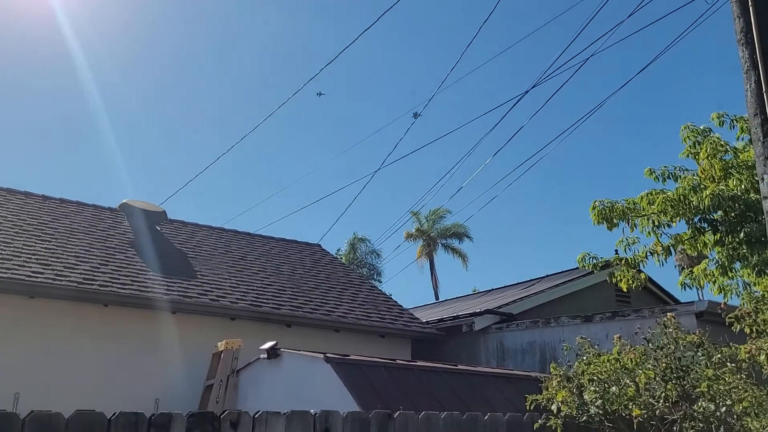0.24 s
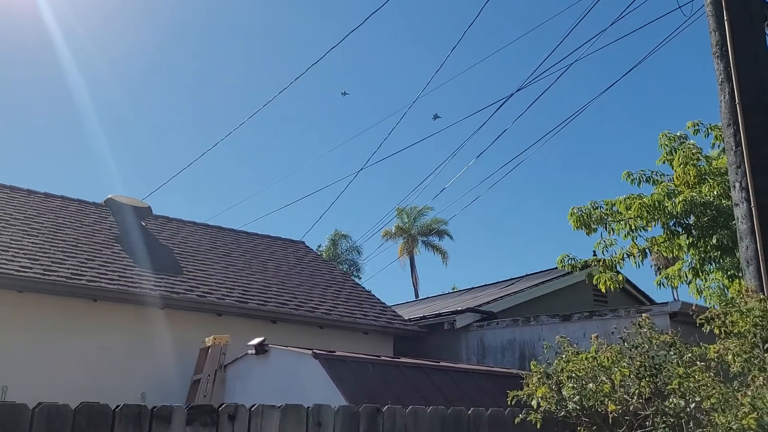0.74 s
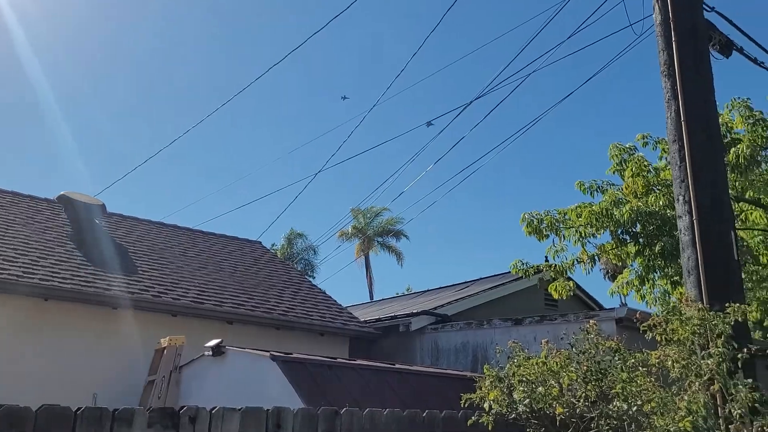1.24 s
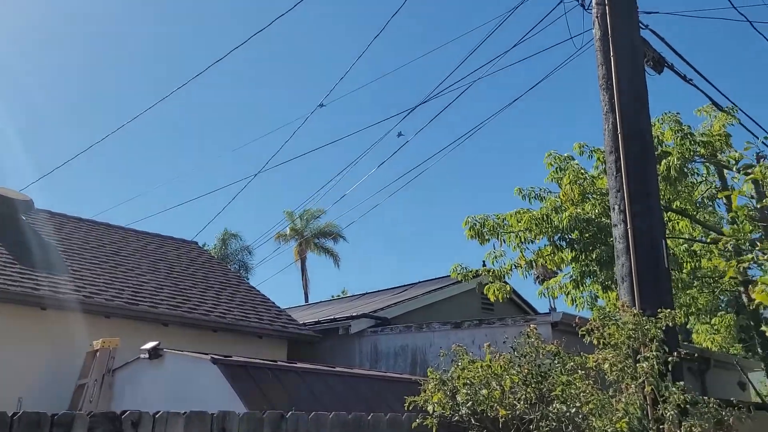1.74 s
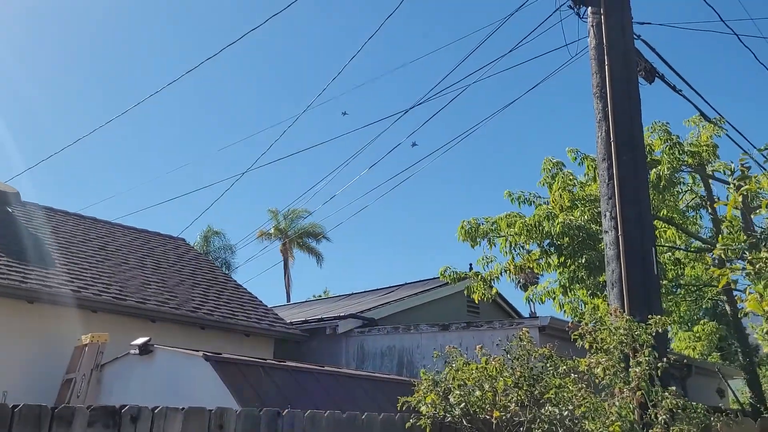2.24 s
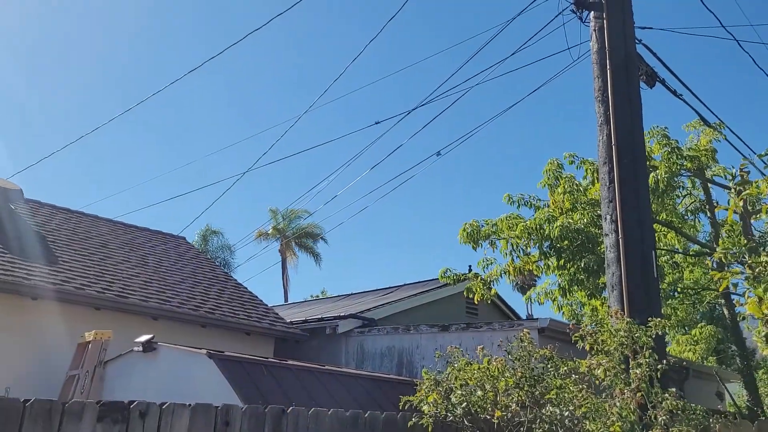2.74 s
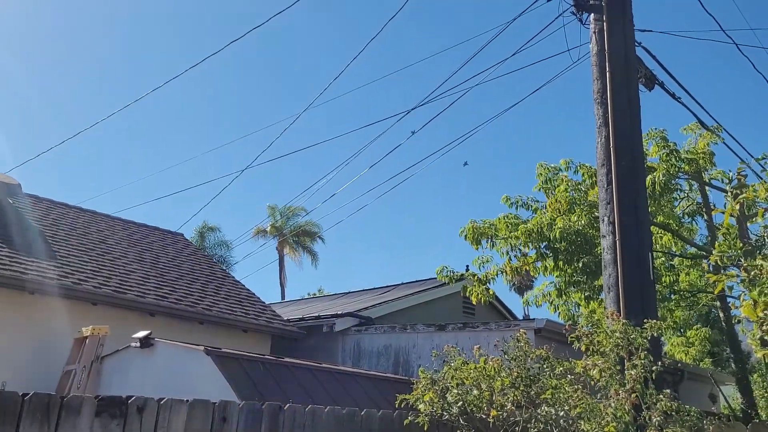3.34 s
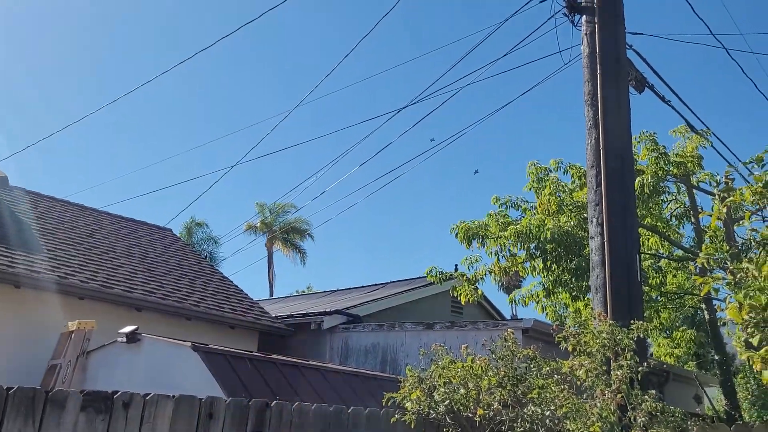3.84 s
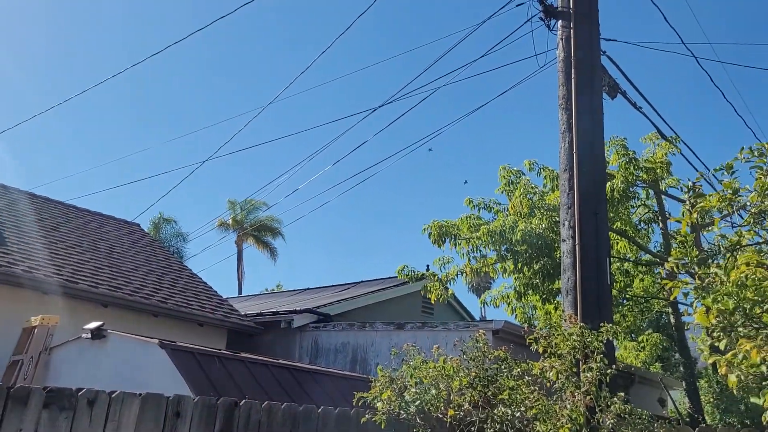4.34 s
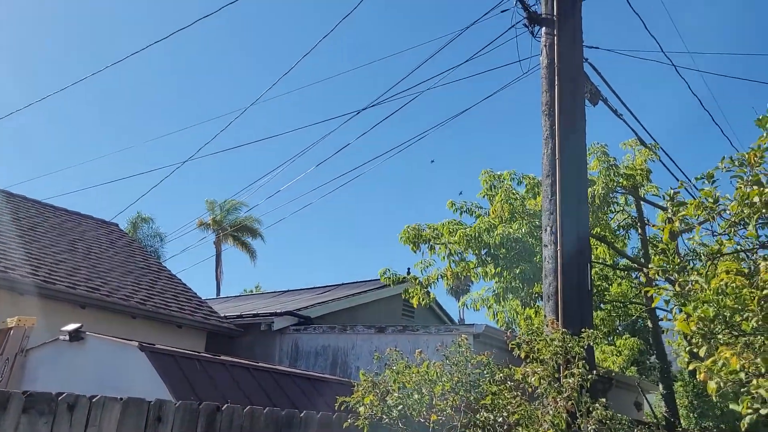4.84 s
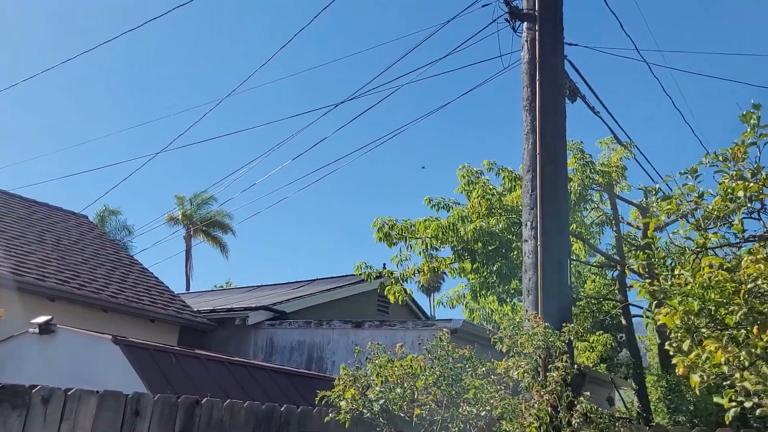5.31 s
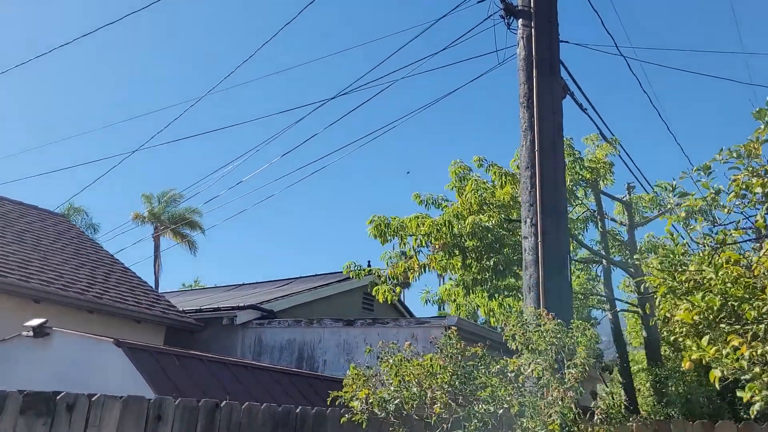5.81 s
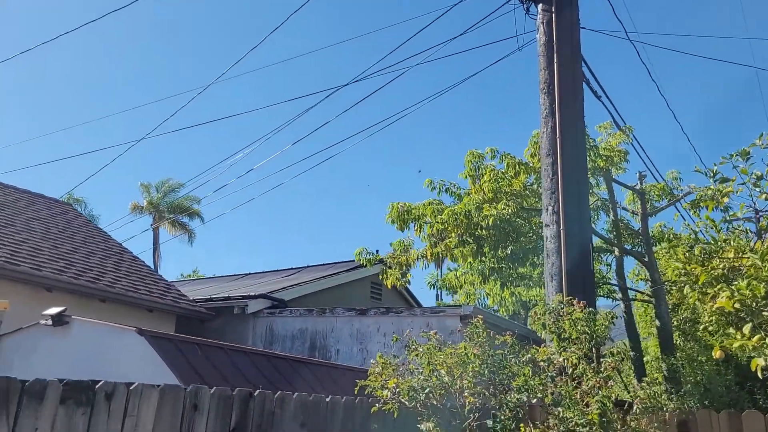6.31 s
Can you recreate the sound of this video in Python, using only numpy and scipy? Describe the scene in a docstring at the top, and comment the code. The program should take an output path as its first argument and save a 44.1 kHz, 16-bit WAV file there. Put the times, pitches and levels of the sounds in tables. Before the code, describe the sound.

A continuous far-off jet roar swells unevenly over a back yard, then turns lower, with fabric rubs and small finger clicks up close.

```python
"""A back yard between houses, with fighter jets crossing the sky far off.
Their roar is random noise with crackling shocks; it swells and fades in turbulent air, then deepens.
A nearby surface echoes it, brief howls and hollows cross it, and a thin hiss marks the nearest point.
Sleeves rustle (grainy noise), and skin scuffs and finger ticks sound on the microphone case.
Outdoor hiss and two faint falling whistles, perhaps a bird, lie behind."""
import sys
import numpy as np
from scipy.fft import rfft, irfft, next_fast_len
from scipy.io import wavfile
from scipy.ndimage import uniform_filter1d, minimum_filter1d

SR = 44100
rng = np.random.default_rng(int(sys.argv[2]) if len(sys.argv) > 2 else 0)


def file_out(sig):
    """Save sig as 16-bit WAV at sys.argv[1]."""
    # one column per channel
    cols = np.atleast_2d(sig).T
    # limit, then scale
    lim = np.clip(cols, -1, 1)
    pcm = np.round(lim * 32767).astype(np.int16)
    wavfile.write(sys.argv[1], SR, pcm)


N = 289737

# Colour of the outdoor hiss: [frequency_hz, level_db per Hz]
AIR_COLOUR = [(2000, 0), (3900, 0), (5200, -1), (6800, -4), (8500, -17), (11000, -17), (15500, -17)]
# Faint falling whistles, perhaps a bird: [start_s, length_s, start_pitch_hz, end_pitch_hz, level_db]
WHISTLE_NOTES = [(2.02, .2, 3720, 3630, -74), (2.2, .28, 4620, 4270, -78)]
# Bright colour of rubbing beside the ports: [frequency_hz, level_db per Hz]
CLOTH_COLOUR = [(1200, -2.5), (2500, 7), (3700, 0), (4300, -1), (6200, -3), (8700, -7), (11500, 1),
                (12500, 2), (13800, 0.5), (15500, -4)]
# Rubbing by sleeves and fingers, before one shared lift:
# [peak_s, rise_s, fall_s, level_db, left_minus_right_db]
RUB_STROKES = [(.09, 0.22, 0.21, -58.5, -0.5), (.57, 0.05, 0.086, -54.5, 0), (.82, 0.12, 0.097, -59, -1),
               (1.003, 0.073, 0.14, -54, -2), (1.17, 0.062, .04, -68.5, -3),
               (1.469, 0.058, 0.13, -53, -0.5), (1.7, 0.011, 0.081, -59, -0.5), (1.929, .06, .07, -68, -2),
               (2.12, .04, 0.054, -70.5, 4), (2.33, 0.098, 0.089, -69, 0), (2.568, 0.018, 0.013, -56, 7.5),
               (2.66, .1, .1, -71.5, 1), (2.728, 0.016, 0.01, -63, 9), (3.8, 0.017, 0.005, -59, 24.5),
               (3.43, 0.027, 0.04, -71, -2.5), (4.3, 0.027, 0.08, -74.5, -2), (4.804, 0.11, 0.13, -61.5, 0),
               (4.99, 0.044, 0.03, -52, 0.5), (5.14, 0.094, 0.13, -59, -0.5), (5.32, .07, 0.087, -62.5, 2),
               (5.535, 0.12, 0.12, -53, -0.5), (5.874, 0.022, 0.029, -51, 0), (6.2, 0.078, 0.11, -55, -0.5),
               (6.38, .03, 0.11, -62, -1)]
# Skin scuffs on the case, before one shared lift: [centre_s, half_width_s, level_db]
SKIN_SCUFFS = [(.572, 0.017, -52), (.8, 0.082, -61.5), (.955, 0.0076, -60), (1.475, 0.018, -57.5),
               (1.57, 0.034, -62), (4.995, 0.013, -56), (5.518, .012, -56), (5.566, .014, -57.5),
               (6.2, 0.026, -59)]
# Colour of a tick on the case, harder and lower than rubbing: [frequency_hz, level_db per Hz]
CASE_COLOUR = [(1200, -1), (2500, 10), (4000, 7), (6200, 3.5), (8700, -3.5), (12000, 1), (15500, -4.5)]
# Finger ticks; a slipping finger makes a quick run: [start_s, starting_level_db, left_minus_right_db]
FINGER_TICKS = [(0.0538, -38, 9), (.127, -48, 3), (.141, -50, 4), (0.278, -41, 4), (0.282, -39, -2),
                (0.8026, -45, -1), (.841, -43, 0), (.9445, -50, -1), (1.0125, -44, 3), (1.3777, -42, -2),
                (1.473, -50, 1), (1.49, -50, -3), (1.7, -52, -5.5), (2.6475, -47, 18), (2.73, -44, 17),
                (2.742, -53, 12.5), (3.762, -48, 9), (3.7803, -47, 15.5), (3.784, -47, 20),
                (3.7895, -46, 20), (3.795, -47, 20), (3.799, -39, 19.5), (3.802, -47, 20),
                (3.8047, -41, 25), (3.829, -49, 12), (4.9855, -39, 1), (5.512, -42, 0), (5.576, -40, 2),
                (5.637, -44, -1), (5.858, -41, -1), (6.066, -54, -1.5), (6.381, -43.5, 2.5)]
# Thin engine hiss that carries only at the nearest point: [frequency_hz, level_db per Hz]
ENGINE_HISS_COLOUR = [(1900, -8.5), (2600, 7.5), (3200, 7.5), (4100, -8), (5000, -3), (5500, 0),
                      (6000, -7.5), (7000, -20.5)]
# Surges and lulls as turbulent air focuses the roar:
# [centre_s, half_width_s, rumble_db, swell_db, rasp_db]
ROAR_SURGES = [(.105, .065, -2.5, -0.5, 6.5), (0.334, 0.051, 1.5, 0, -7.5), (.445, .035, 1.5, 2, 2),
               (.665, 0.053, 2.5, -2.5, -0.5), (0.964, 0.057, 5, -1.5, 5), (1.105, 0.066, 0, 3.5, 0.5),
               (1.209, 0.019, -1, -1.5, 2), (1.326, 0.088, 3, -5.5, -6), (1.453, .072, 0, 3, -5.5),
               (1.628, 0.037, 5, 3.5, -2), (1.74, 0.042, -0.5, 5, 2.5), (1.876, 0.081, -1, -0.5, -3.5),
               (2.039, .047, 3.5, -2.5, 1), (2.161, 0.1, -1.5, -3.5, -2.5), (2.366, .066, 1.5, -1.5, 1),
               (2.501, 0.032, 5.5, 1, 10.5), (2.619, .04, 5, 1, -2.5), (2.771, 0.052, -2, 1, 13),
               (3.154, 0.049, 3, 0.5, 2.5), (3.405, 0.052, 5.5, 2.5, 3), (3.6, 0.048, -2, -5, 3),
               (3.849, 0.059, -1.5, -4, 7), (4.074, .031, 2.5, 0, -5), (4.496, .062, -0.5, 3, -3.5),
               (4.739, 0.11, -1, 5, 0), (4.976, 0.041, 4, -2, 4), (5.098, 0.05, -0.5, -2, -2.5),
               (5.394, .046, -3, -2.5, -4), (5.619, 0.071, 2, 2.5, -4.5), (5.82, 0.08, 0, 5, 5.5),
               (6.037, 0.1, 1, 7, -2.5), (6.302, .067, 1, -1, -5.5), (6.498, .089, 3.5, -1, -9)]
# Exhaust colour after the long path through air: [frequency_hz, level_db per Hz]
EXHAUST_COLOUR = [(20, -45), (36, -26), (60, -13.5), (92, -10.5), (150, -0.5), (230, -1.5), (330, 2),
                  (410, -1), (510, 1), (640, -5), (790, -7.5), (1150, -14), (1380, -16), (1620, -18),
                  (2100, -35.5), (2700, -52)]
# Treble shaping by the air, applied on top of the exhaust colour: [frequency_hz, gain_db]
AIR_ABSORPTION = [(2700, 6), (3300, -6.5), (4100, -24), (5300, -18.5), (6500, -29), (8500, -42)]
# Resonances between the house walls: [frequency_hz, width_hz, lift_db]
YARD_RESONANCES = [(166.3, 27, -0.5), (329.5, 25, 1)]
# Sound scattered by walls and trees, against the direct sound: [frequency_hz, level_db]
SCATTERED_SOUND = [(30, -10.5), (60, -4), (110, -15.5), (180, -20), (270, -8), (380, -11), (600, -3.5),
                   (1100, -10.5), (1700, -6), (2200, 11.5), (3200, 6)]
# Balance between the ports: [frequency_hz, left_minus_right_db]
PORT_BALANCE = [(60, -1.5), (300, 0), (520, -2), (740, -0.5), (950, -3), (1650, -2.5), (2050, 0), (2500, 5),
                (3300, 1.5)]
# How far the left port leads the right: [frequency_hz, lead_radians]
LEFT_PORT_LEAD = [(0, 0), (550, 0.06), (850, 0.91), (1300, 1.54), (1550, 1.65), (1900, 2), (2200, 3.5),
                  (2700, 0.7)]
# Narrow howls, levels against the roar before its registers are levelled:
# [centre_s, half_width_s, pitch_hz, half_width_hz, level_db]
ROAR_HOWLS = [(.05, 0.1, 280.8, 62, -1), (0.119, 0.048, 1050, 150, -13.5), (0.45, 0.47, 481.8, 52, -6.5),
              (0.979, 0.14, 1076, 98, -16), (1.75, 0.16, 475.5, 34, 1.5), (1.741, 0.042, 760, 74, -7.5),
              (2.031, 0.028, 1653, 110, -29.5), (2.37, 0.054, 2410, 280, -42.5),
              (2.539, 0.038, 226.5, 33, -1), (2.771, 0.1, 537, 25, -5.5), (3.88, 0.19, 1212, 203, -15),
              (4.47, 0.11, 382, 17, -6.5), (4.72, 0.092, 327.6, 31, -10.5), (5.951, 0.054, 373, 79, -5),
              (6.08, 0.14, 722, 97, -9.5), (6.421, 0.22, 323, 32, -4.5), (6.487, 0.092, 163, 17, -10.5)]
# Borders between the pitch registers of the roar: [frequency_hz]
REGISTER_BORDERS = [110, 250, 600, 1250, 2100]
# How each register follows the pass, from deep thunder to the top of the rasp:
# [level_at_pass_db, before_db_per_s, after_db_per_s, rumble_share, swell_share, rasp_share]
REGISTER_PATHS = [(-41, -0.7, 3.5, -0.23, 0.0, 0.12), (-26.5, 1.5, 1.94, 1, 0.29, 0.032),
                  (-20, 1.04, -0.62, -0.25, 1.0, 0.067), (-26.5, 0.56, -0.45, -0.16, 0.37, 0.66),
                  (-41.5, 2, 0.13, 0.42, 0.0, 0.95), (-54, 0.5, -1.43, -0.36, 0.061, 0.64)]
# Strength of the quick random twinkle in each register: [strength_db]
REGISTER_TWINKLE = [0.43, 1.2, 1, 1.5, 2, 3.3]
# Hollow moments of the roar: [centre_s, half_width_s, frequency_hz, half_width_hz, gain_db]
ROAR_HOLLOWS = [(.74, 0.26, 637, 70, -4.5), (1.41, 0.064, 680, 130, -8.5), (4.621, 0.22, 887, 250, -1.5)]

PASS_S = 3.27   # the turning point, after which the roar deepens
ECHO_S, ECHO_SHARE = 0.002612, 0.2   # reflection from a nearby surface
CUTOFF_HZ = 15850


def from_db(db):
    """Turn decibels into gain."""
    return 10 ** (np.asarray(db) / 20)


def rms_one(x):
    """Scale to unit power."""
    return x / np.sqrt(np.mean(x ** 2) + 1e-20)


def seconds():
    """Give the time of every sample."""
    return np.arange(N) / SR


def bins():
    """List the frequencies on which filters are written."""
    return np.linspace(0, SR / 2, next_fast_len(N // 2 + 4096) + 1)


def filtered(x, response):
    """Pass x through a frequency response."""
    return irfft(rfft(x, 2 * len(response) - 2) * response)[..., :N]


def colour(points):
    """Join frequency and decibel points into a gain at every frequency."""
    hz, db = np.transpose(points)
    return from_db(np.interp(np.log(bins() + 1), np.log(hz), db))


def causal(gain):
    """Make the minimum-phase response with this gain: nothing sounds before its cause."""
    cepstrum = irfft(np.log(gain + 1e-9))
    cepstrum[1:len(gain) - 1] *= 2
    cepstrum[len(gain):] = 0
    return np.exp(rfft(cepstrum))


def panned(db):
    """Give left and right gains for a left-minus-right difference."""
    return from_db(np.array([[.5], [-.5]]) * db)


def stereo_noise():
    """Make separate random noise for each port."""
    return rng.standard_normal((2, N))


def wander(per_s):
    """Draw a new random value so many times a second and join them with straight lines."""
    return np.interp(seconds() * per_s, np.arange(400), rng.standard_normal(400))


def around(s, width_s):
    """Pick the samples within five half-widths of a moment."""
    first = max(int((s - 5 * width_s) * SR), 0)
    last = min(int((s + 5 * width_s) * SR), N)
    return np.arange(first, last)


def bell(s, width_s):
    """Rise and fall smoothly around one moment."""
    out, near = np.zeros(N), around(s, width_s)
    out[near] = np.exp(-.5 * ((near / SR - s) / width_s) ** 2)
    return out


def impulses(per_s, spread_db):
    """Scatter one-sided impulses in time, most small and a few large; unit power."""
    sizes = from_db(spread_db * np.minimum(rng.exponential(1, N), 4))
    train = sizes * (rng.random(N) < per_s / SR)
    return rms_one(train - train.mean())


def outdoor_air(level_db=-70, drift_db=5.5):
    """Coloured random noise gives a quiet outdoor hiss whose level drifts."""
    hiss = rms_one(filtered(stereo_noise(), colour(AIR_COLOUR)))
    return from_db(level_db + drift_db * wander(per_s=4.6)) * hiss * panned(0.94)


def whistles(blur_hz=40, blur_share=.5):
    """Soft notes slide down, slightly blurred by their way through the trees."""
    out = 0
    for s, length, start_hz, end_hz, level_db in WHISTLE_NOTES:
        along = np.clip((seconds() - s) / length, 0, 1)
        phase = 2 * np.pi * np.cumsum(start_hz + (end_hz - start_hz) * along) / SR
        blur = rms_one(filtered(stereo_noise(), 1 / (1 + (bins() / blur_hz) ** 2)))
        note = np.sin(phase) + blur_share * blur * np.cos(phase)
        out = out + from_db(level_db) * np.sin(np.pi * along) * note
    return out


def friction(grain_db=2.5):
    """Fibres catch and slip: dense fine grains in a hiss, different at each port."""
    grains = np.array([impulses(per_s=1800, spread_db=3.2) for port in range(2)])
    rough = stereo_noise() + from_db(grain_db) * grains
    return rms_one(filtered(rough, causal(colour(CLOTH_COLOUR))))


def handling(lift_db=3, catch_db=0.5):
    """Each rubbing stroke grows as it presses harder, catches unevenly, then dies away."""
    gain = 0
    for s, rise_s, fall_s, stroke_db, pan_db in RUB_STROKES:
        since = seconds() - s
        away = np.minimum(abs(since / np.where(since < 0, rise_s, fall_s)), 20)
        stroke = from_db(stroke_db + lift_db) * np.exp(-away) * panned(pan_db)
        gain = np.hypot(gain, stroke)   # overlapping strokes add their power
    return gain * from_db(catch_db * wander(per_s=33)) * friction()


def scuffs(centre_hz=3300, width_hz=950, slips_per_s=350, spread_db=4, lift_db=2):
    """Skin drags on the case in a quick run of tiny slips."""
    gain = sum(from_db(scuff_db + lift_db) * bell(s, width_s) for s, width_s, scuff_db in SKIN_SCUFFS)
    slips = np.array([impulses(slips_per_s, spread_db) for port in range(2)])
    resonance = 1 / (1 + ((bins() - centre_hz) / width_hz) ** 2)
    return gain * rms_one(filtered(slips, causal(resonance)))


def ticks(decay_s=.0008):
    """Each touch of the case is a tiny noise burst that dies at once."""
    t, gain = seconds(), np.zeros((2, N))
    for s, start_db, pan_db in FINGER_TICKS:
        after = slice(int(s * SR), int(s * SR) + SR // 20)
        gain[:, after] += from_db(start_db) * np.exp(-(t[after] - s) / decay_s) * panned(pan_db)
    return gain * rms_one(filtered(stereo_noise(), colour(CASE_COLOUR)))


def engine_hiss(level_db=-64, width_s=0.3):
    """Faint high engine noise swells and fades around the pass."""
    hiss = rms_one(filtered(stereo_noise(), colour(ENGINE_HISS_COLOUR)))
    return from_db(level_db) * bell(PASS_S, width_s) * hiss


def surges():
    """Turbulent air lifts or lowers the rumble, swell and rasp of the roar over time, in dB."""
    return sum(np.outer(lifts_db, bell(s, width_s)) for s, width_s, *lifts_db in ROAR_SURGES)


def multipath(source, share=.17, fade_per_s=3):
    """Longer paths through moving air come and go, so shifting ripples colour the roar."""
    out = source
    for delay_s in rng.uniform(.008, .04, 8):
        out = out + share * wander(fade_per_s) * np.roll(source, int(delay_s * SR))
    return out


def at_microphone(source):
    """Direct sound and one short echo reach the two ports out of step, mixed with scattered noise."""
    direct = filtered(source, 1 + ECHO_SHARE * np.exp(-2j * np.pi * bins() * ECHO_S))
    lead = np.interp(bins(), *np.transpose(LEFT_PORT_LEAD))
    ports = np.array([direct, filtered(direct, np.exp(-1j * lead))])
    scatter = colour(SCATTERED_SOUND)
    both = ports + filtered(stereo_noise(), scatter)
    tilt = np.sqrt(colour(PORT_BALANCE))
    total = np.sqrt(1 + scatter ** 2)   # keeps the power even after scatter is added
    return np.array([filtered(both[0], tilt / total), filtered(both[1], 1 / (tilt * total))])


def howls(sink_per_s=.08):
    """Narrow bands of noise stand out for a moment, each sinking in pitch."""
    out = np.zeros(N)
    # slow noise is made at one twentieth of the sample rate
    coarse_s = np.arange(N // 20 + 1) * 20 / SR
    coarse_hz = np.linspace(0, SR / 40, 8193)
    for s, width_s, hz, width_hz, howl_db in ROAR_HOWLS:
        noise = rng.standard_normal((2, len(coarse_s)))
        noise = filtered(noise, 1 / (1 + (coarse_hz / width_hz) ** 4))
        noise = rms_one(noise[:, :len(coarse_s)])
        near = around(s, width_s)
        since = near / SR - s
        flutter = [np.interp(near / SR, coarse_s, part) for part in noise]
        phase = 2 * np.pi * hz * since * (1 - .5 * sink_per_s * since)
        band = flutter[0] * np.cos(phase) + flutter[1] * np.sin(phase)
        out[near] += from_db(howl_db) * bell(s, width_s)[near] * band
    return out * panned(-1.5)


def exhaust(shock_db):
    """Turbulent mixing noise and weak shocks, dulled by the air and coloured by the yard."""
    source = rng.standard_normal(N) + from_db(shock_db) * impulses(per_s=300, spread_db=1.5)
    tone = colour(EXHAUST_COLOUR) * colour(AIR_ABSORPTION)
    for hz, width_hz, lift_db in YARD_RESONANCES:
        tone = tone * from_db(lift_db / (1 + (2 * (bins() - hz) / width_hz) ** 2))
    sound = filtered(at_microphone(multipath(source)), causal(tone))
    return rms_one(sound) + howls()


def jets(shock_db=-7, crackle_growth=0.85):
    """Each register of the exhaust noise follows the pass and the surges; bright surges crackle more."""
    rumble_db, swell_db, rasp_db = surges()
    sound = exhaust(shock_db + crackle_growth * rasp_db)
    since = seconds() - PASS_S
    # each register is the difference between two neighbouring low-pass filters
    below = [0] + [1 / (1 + (bins() / hz) ** 12) for hz in REGISTER_BORDERS] + [1]
    out = 0
    for low, high, twinkle_db, path in zip(below, below[1:], REGISTER_TWINKLE, REGISTER_PATHS):
        pass_db, before, after, rumble, swell, rasp = path
        level_db = pass_db + since * np.where(since < 0, before, after)
        level_db = level_db + rumble * rumble_db + swell * swell_db + rasp * rasp_db
        level_db = level_db + twinkle_db * wander(per_s=22)
        register = filtered(sound, high - low)
        # even out the register's own slow swings before setting its level
        power = uniform_filter1d(register.mean(axis=0) ** 2, size=6000)
        power = uniform_filter1d(power, size=2200)
        out = out + register / np.sqrt(power) * from_db(level_db)
    return out


def hollowed(roar):
    """A reflection cancels part of one band for a moment, so the roar sounds hollow."""
    for s, width_s, hz, width_hz, gain_db in ROAR_HOLLOWS:
        band = filtered(roar, 1 / (1 + ((bins() - hz) / width_hz) ** 4))
        roar = roar + band * (from_db(gain_db * bell(s, width_s)) - 1)
    return roar


def scene():
    """Set the jets over a quiet yard, with small noises at the microphone."""
    background = outdoor_air() + whistles()
    touches = handling() + scuffs() + ticks()
    return background + touches + engine_hiss() + hollowed(jets())


def record(dry):
    """Ease the gain down around peaks above full scale and cut the top steeply."""
    gain = minimum_filter1d(1 / np.maximum(abs(dry).max(axis=0), 1), size=900)
    gain = uniform_filter1d(uniform_filter1d(gain, size=440), size=440)
    return filtered(dry * gain, 1 / (1 + (bins() / CUTOFF_HZ) ** 300))


dry = scene()
out = record(dry)
file_out(out)
```